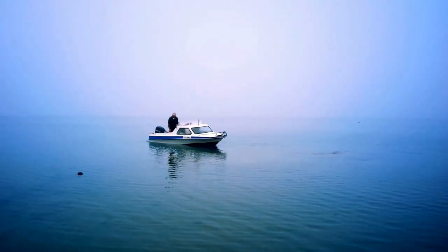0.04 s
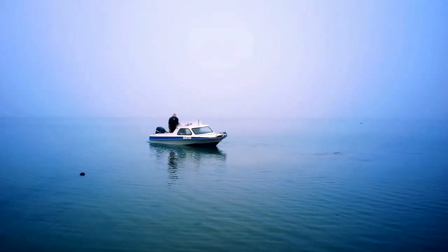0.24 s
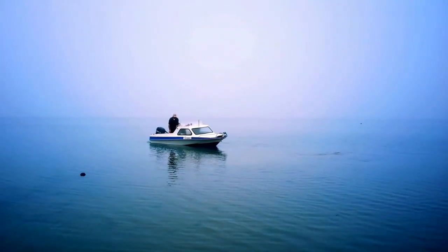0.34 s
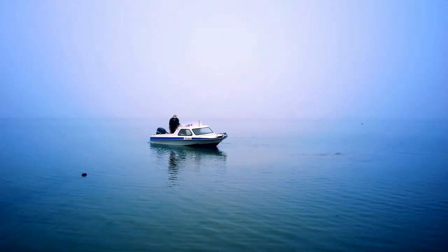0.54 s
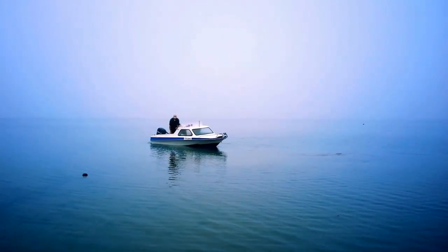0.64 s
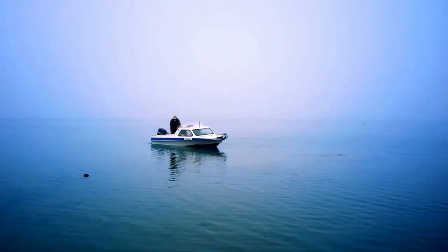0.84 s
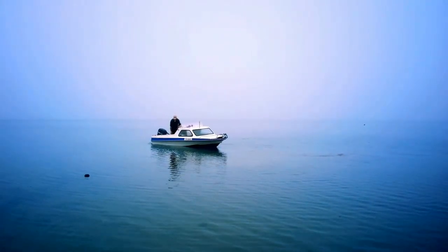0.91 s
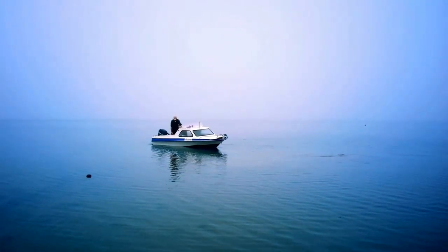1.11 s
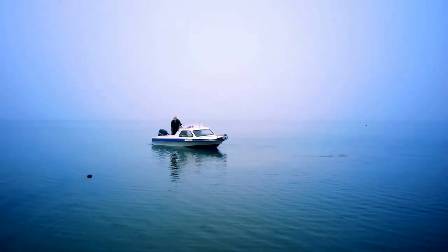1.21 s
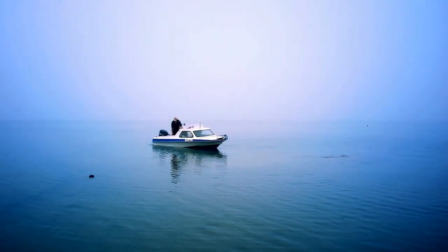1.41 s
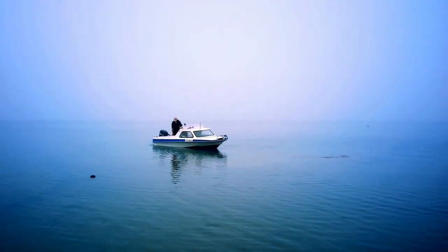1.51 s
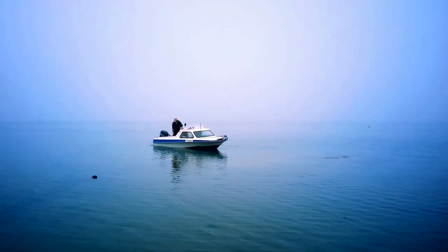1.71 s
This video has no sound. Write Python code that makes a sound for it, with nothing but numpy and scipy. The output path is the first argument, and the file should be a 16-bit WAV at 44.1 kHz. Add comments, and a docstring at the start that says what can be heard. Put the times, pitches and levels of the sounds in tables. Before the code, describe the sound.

A light breeze blows by calm water, with quiet ripples washing the shore. A faint, distant bird whistle comes first, then a gust thumps the microphone once, a second flutters briefly, and the soft rumble and lapping continue.

```python
"""Calm open water in a light breeze. Far wind makes a low, gently swelling rumble, and on the right
ripples wash the shore as a dense sum of tiny splashes, with single laps standing out.
Air hisses across the edge of the left microphone port, and a far bird gives one faint falling whistle.
Two gusts flutter on that port, and one strong puff excites its damped response: a dull thump."""
import sys
import numpy as np
from scipy import signal
from scipy.fft import rfft, irfft
from scipy.io import wavfile

SR = 44100
rng = np.random.default_rng(int(sys.argv[2]) if len(sys.argv) > 2 else 0)


def output_pcm(signal):
    """Save a mono or channel-first signal as 16-bit PCM at the path in sys.argv[1].

    Samples are clipped to [-1, 1] before scaling.
    """
    pcm = np.clip(np.atleast_2d(signal).T, -1, 1) * 32767
    wavfile.write(sys.argv[1], SR, np.round(pcm).astype(np.int16))


N = 77175
TIME_S = np.arange(N) / SR
BIN_HZ = np.arange(N // 2 + 1) * SR / N


def undb(db):
    """Amplitude ratio: tenfold for every 20 dB."""
    return 10 ** (np.asarray(db) / 20)


def unit(x):
    """Normalisation to rms 1."""
    return x / np.sqrt(np.mean(x ** 2))


def noise():
    """Gaussian white noise: equal mean power per hertz."""
    return rng.standard_normal(N)


def curve(rows, column=1):
    """Linear interpolation of one table column over time."""
    rows = np.array(rows)
    return np.interp(TIME_S, rows[:, 0], rows[:, column])


def gain_at(bin_hz, spectrum):
    """Magnitude response: decibels interpolated over log frequency, returned as gain."""
    hz, db = np.array(spectrum).T
    return undb(np.interp(np.log(np.maximum(bin_hz, 1)), np.log(hz), db))


def colour(x, spectrum):
    """Spectral shaping by multiplication in frequency, at rms 1."""
    return unit(irfft(rfft(x) * gain_at(BIN_HZ, spectrum), N))


def drift(cutoff_hz):
    """Random modulation: low-passed noise of mean 0 and rms 1."""
    return unit(irfft(rfft(noise()) * (BIN_HZ > 0) / (1 + (BIN_HZ / cutoff_hz) ** 4), N))


# Spectrum of the far wind (frequency [Hz], relative density [dB])
RUMBLE_SPECTRUM = [(22, -27), (40, -10.5), (68, 0.5), (110, -1), (155, 0), (195, -8), (255, 2.5), (360, -8),
                   (470, -5), (640, -16), (1000, -20), (2000, -28.5)]
# Its envelope (time [s], level [dB])
RUMBLE_ENVELOPE = [(0, -47), (.35, -50), (.57, -45.5), (.75, -49.5), (.83, -46.5), (.92, -49), (1.02, -48),
                   (1.14, -50), (1.23, -46.5), (1.35, -50), (1.6, -49.8), (1.75, -50)]

def far_wind(bass_coherence=0.93, corner_hz=520):
    """Partial coherence: the rumble is alike on both sides in the bass and wider above."""
    coherence = bass_coherence / (1 + (BIN_HZ / corner_hz) ** 2)
    mid = irfft(rfft(noise()) * np.sqrt(1 + coherence), N)
    side = irfft(rfft(noise()) * np.sqrt(1 - coherence), N)
    rumble = np.array([colour(mid + side, RUMBLE_SPECTRUM), colour(mid - side, RUMBLE_SPECTRUM)])
    return undb(curve(RUMBLE_ENVELOPE)) * rumble


def splashes(per_s=900, spread_db=2.5):
    """Poisson process: tiny splashes arrive as independent impulses of uneven size."""
    impulses = (rng.random(N) < per_s / SR) * np.sign(noise())
    return impulses * undb(spread_db * np.minimum(rng.exponential(size=N), 4))


# Spectrum of ripples on the shore (frequency [Hz], relative density [dB])
RIPPLE_SPECTRUM = [(150, 1), (300, 4), (520, -1.5), (720, -2.5), (980, -0.5), (1250, -4), (1650, -18.5),
                   (2300, -14), (3200, -22.5), (7000, -20)]

def ripples(level_db=-50, left_db=-16.5, swell_db=1.42):
    """Shot noise: dense splashes merge into a wavering wash on the right."""
    left = undb(left_db) * colour(splashes(), RIPPLE_SPECTRUM)
    right = colour(splashes(), RIPPLE_SPECTRUM)
    return undb(level_db + swell_db * drift(14)) * np.array([left, right])


# Spectrum of air crossing the port (frequency [Hz], relative density [dB])
EDGE_SPECTRUM = [(2000, -11), (3200, -21), (4300, -9.5), (5100, 2), (5700, -11), (6300, -9), (7200, -12)]
# Its envelope (time [s], level [dB])
EDGE_ENVELOPE = [(0, -57), (.1, -62), (.19, -50.5), (.245, -54), (.265, -80), (.36, -60), (.47, -55.5),
                 (.6, -56), (.66, -50.5), (.77, -57), (.84, -53), (.96, -60), (1.05, -52.5), (1.2, -57.5),
                 (1.48, -53.5), (1.56, -57), (1.75, -57.5)]

def edge_hiss(flicker_db=2.2):
    """Flow noise: air crossing the edge of the left port makes a flickering hiss."""
    envelope = undb(curve(EDGE_ENVELOPE) + flicker_db * drift(60))
    return np.array([envelope * colour(noise(), EDGE_SPECTRUM), np.zeros(N)])


# Contour of the whistle (time [s], frequency [Hz], level [dB])
WHISTLE_CONTOUR = [(0, 1840, -54.5), (.035, 1755, -55.5), (.075, 1712, -63), (.11, 1660, -52.5),
                   (.13, 1655, -74)]

def bird(waver=0.0088, left_db=-20):
    """Frequency modulation: a far, nearly pure whistle wavers as it falls, on the right."""
    hz = curve(WHISTLE_CONTOUR) * (1 + waver * drift(60))
    envelope = undb(curve(WHISTLE_CONTOUR, column=2)) * (TIME_S < WHISTLE_CONTOUR[-1][0])
    tone = envelope * np.sqrt(2) * np.sin(2 * np.pi * np.cumsum(hz) / SR)
    return np.array([undb(left_db) * tone, tone])


# Gaussian swells of wind (peak time [s], level [dB], rise width [s], fall width [s])
GUST_SWELLS = [(0.215, -40, 0.059, 0.037), (0.477, -40.5, 0.055, 0.032)]
# Spectrum of their flutter (frequency [Hz], relative density [dB])
FLUTTER_SPECTRUM = [(30, -18.5), (90, 2), (220, 0), (500, -10.5), (1000, -14.5), (2000, -23.5), (3000, -25),
                    (7000, -27)]

def gusts(flutter_db=2.0):
    """Amplitude modulation: low noise flutters on the left port as each gust swells and fades."""
    envelope = np.zeros(N)
    for at, db, rise, fall in GUST_SWELLS:
        width = np.where(TIME_S < at, rise, fall)
        envelope += undb(db) * np.exp(-((TIME_S - at) / width) ** 2 / 2)
    flutter = unit(undb(flutter_db * drift(90)) * colour(noise(), FLUTTER_SPECTRUM))
    return np.array([envelope * flutter, np.zeros(N)])


# Laps of water (peak time [s], level [dB], Gaussian width [s], frequency [Hz], left minus right [dB])
LAP_BURSTS = [(0.19, -45, .012, 610, -20), (.3, -50, 0.011, 880, -6), (0.327, -58.5, .006, 2400, 2),
              (0.422, -48.5, 0.013, 830, -10), (0.544, -55, 0.0046, 1700, 1),
              (0.573, -46.5, 0.019, 630, -9.5), (0.664, -54.5, .01, 910, 0), (.745, -53, .025, 800, -5.5),
              (0.812, -49, 0.011, 980, -9), (0.857, -45, 0.0052, 910, -18), (1.203, -52, 0.011, 880, -10),
              (1.241, -47.5, 0.016, 720, -9.5), (1.457, -47.5, 0.0067, 1000, -14),
              (1.687, -53, 0.0068, 1080, -14)]

def laps(edge_ratio=1.26):
    """Band-limited noise: each lap is a short swell of splashing around one pitch."""
    out = np.zeros((2, N))
    for at, db, width, hz, pan_db in LAP_BURSTS:
        band = signal.butter(2, [hz / edge_ratio, hz * edge_ratio], "band", fs=SR, output="sos")
        splash = np.array([unit(signal.sosfilt(band, noise())) for _ in range(2)])
        sides = undb([[min(pan_db, 0)], [min(-pan_db, 0)]])
        envelope = undb(db) * np.exp(-((TIME_S - at) / width) ** 2 / 2)
        out += sides * envelope * splash
    return out


def impulse_response(spectrum, size=4096):
    """Minimum phase: folding the cepstrum gives a causal response with this spectrum, at peak 1."""
    bin_hz = np.arange(size // 2 + 1) * SR / size
    cepstrum = irfft(np.log(gain_at(bin_hz, spectrum)))
    folded = np.r_[cepstrum[0], 2 * cepstrum[1:size // 2]]
    response = irfft(np.exp(rfft(folded, size)))
    return response / np.abs(response).max()


# Pushes of air on the left port, one strong and four faint (time [s], peak level [dB])
PUFF_IMPULSES = [(0.2479, 0), (0.2627, -30), (0.2872, -30.5), (0.4778, -28), (0.4954, -26.5)]
# Frequency response of the port (frequency [Hz], relative gain [dB])
PORT_RESPONSE = [(20, -52.5), (42, -16), (75, -5), (130, 1), (220, 2.5), (350, -3), (500, -6.5),
                 (620, -12.5), (880, -16), (1120, -30.5), (1350, -25), (1750, -28), (2100, -43),
                 (2700, -64), (4000, -77.5), (8000, -76)]

def puffs(right_db=-18.5, right_lag_s=0.00201):
    """Damped response: the port leaks, so after each push the pressure swings back and settles."""
    pushes = sum(undb(db) * (np.arange(N) == int(at * SR)) for at, db in PUFF_IMPULSES)
    left = signal.fftconvolve(pushes, impulse_response(PORT_RESPONSE))[:N]
    right = undb(right_db) * np.interp(TIME_S - right_lag_s, TIME_S, left)
    return np.array([left, right])


def scene():
    """Superposition: the pressures of all sources add at the two ports."""
    return far_wind() + ripples() + edge_hiss() + bird() + gusts() + laps() + puffs()


# Spectrum of the microphone's own hiss (frequency [Hz], relative density [dB])
SELF_NOISE_SPECTRUM = [(300, -1.5), (1500, 4), (2100, -0.5), (3100, -12.5), (4000, -0.5), (5000, -0.5),
                       (7200, -2.5)]

def record(dry, hiss_db=-55, left_db=1, cutoff_hz=7300):
    """Noise floor and bandwidth: the microphone adds steady hiss, and the recorder cuts the top."""
    left = undb(left_db) * colour(noise(), SELF_NOISE_SPECTRUM)
    right = colour(noise(), SELF_NOISE_SPECTRUM)
    hiss = undb(hiss_db) * np.array([left, right])
    low_pass = signal.ellip(12, .1, 70, cutoff_hz, fs=SR, output="sos")
    return signal.sosfilt(low_pass, dry + hiss)


dry = scene()
out = record(dry)
output_pcm(out)
```